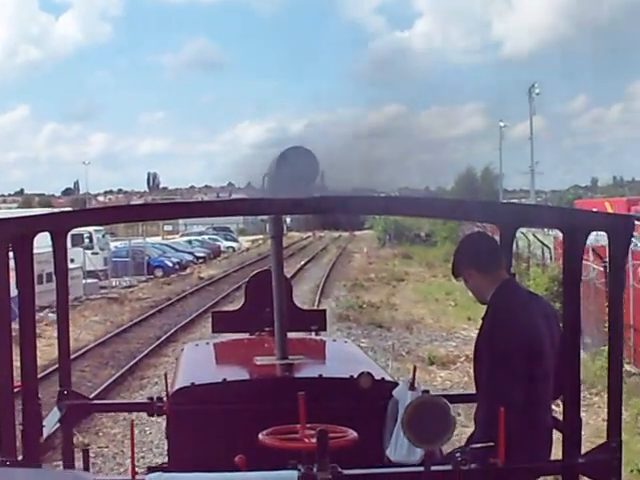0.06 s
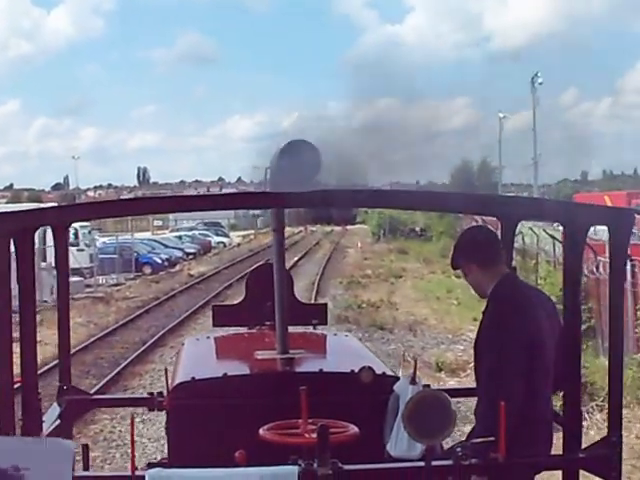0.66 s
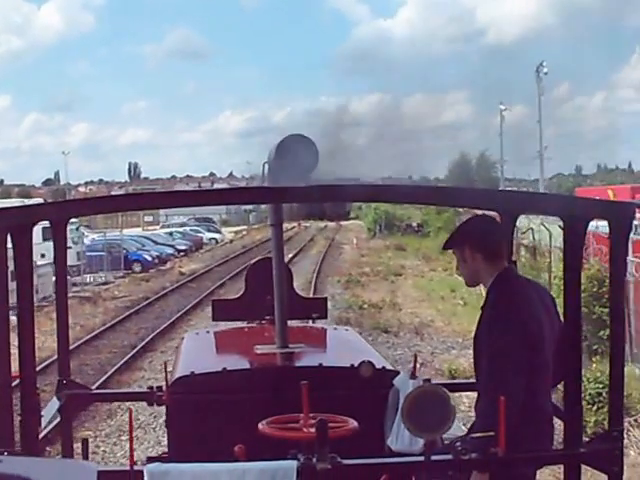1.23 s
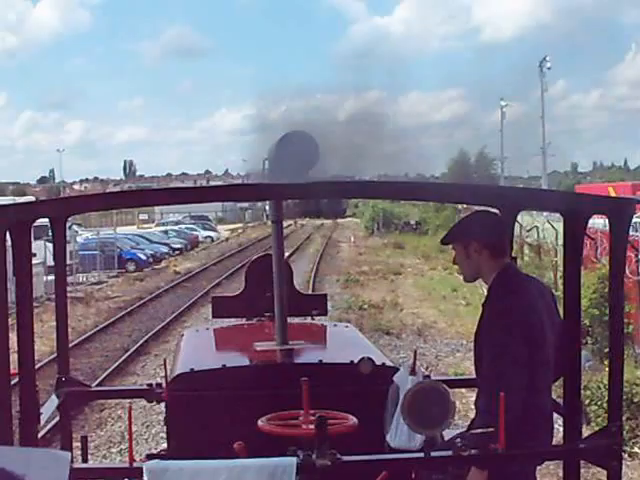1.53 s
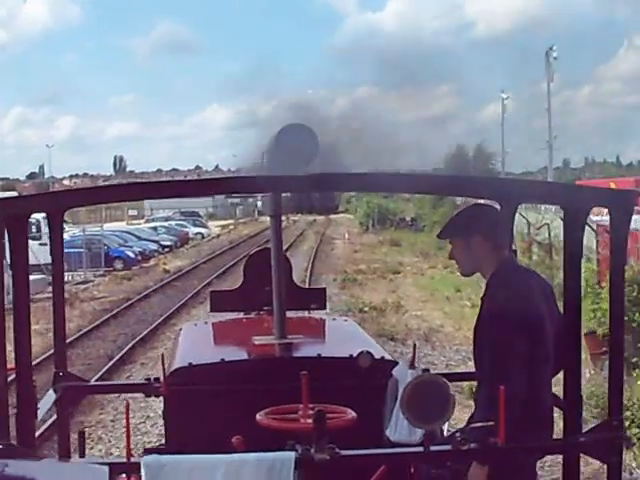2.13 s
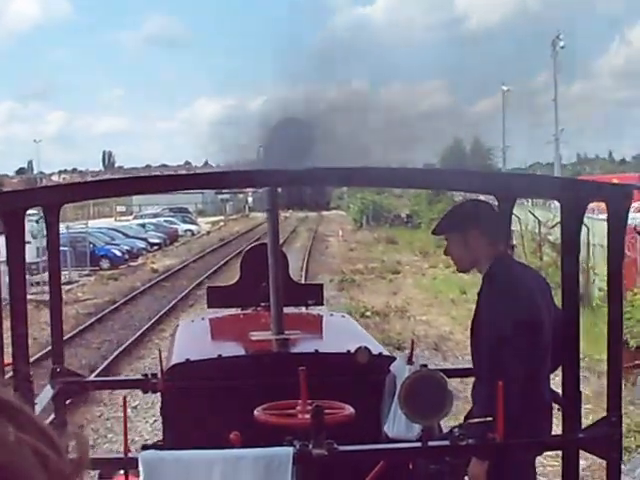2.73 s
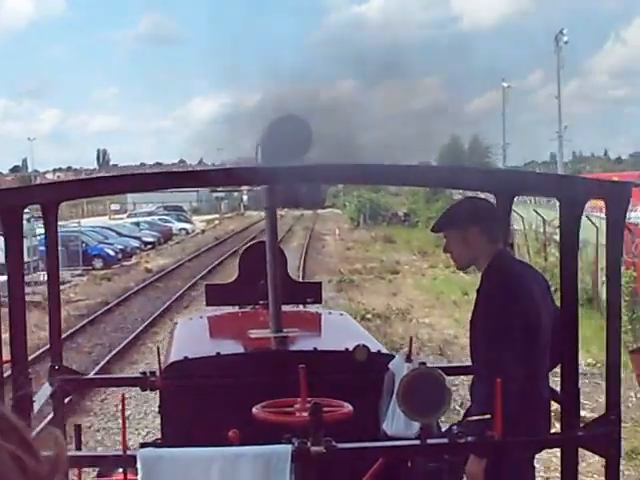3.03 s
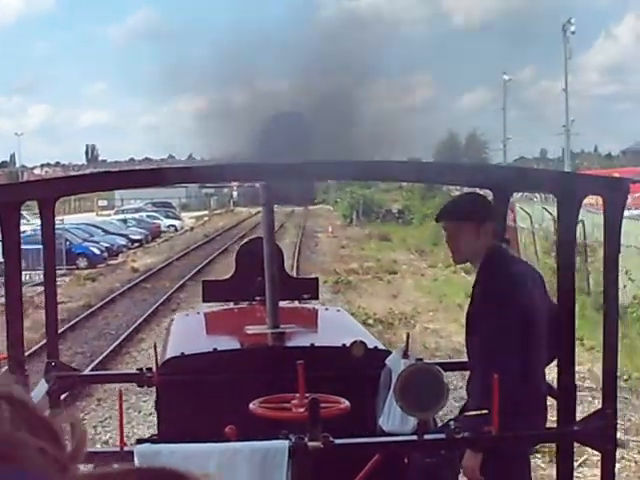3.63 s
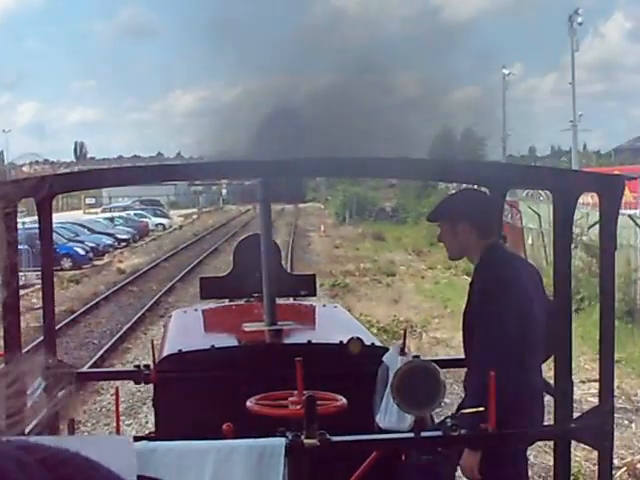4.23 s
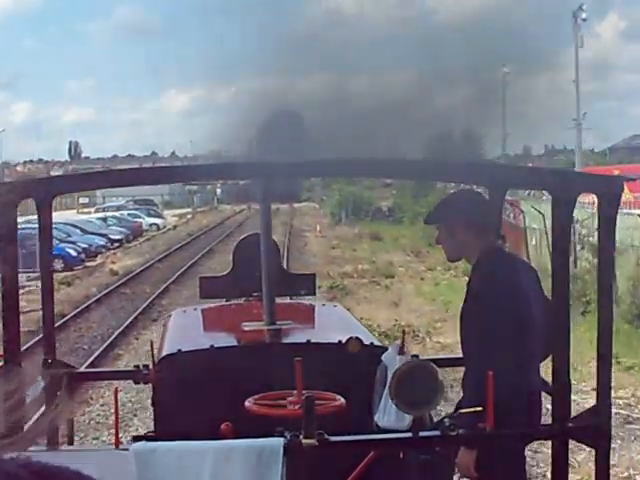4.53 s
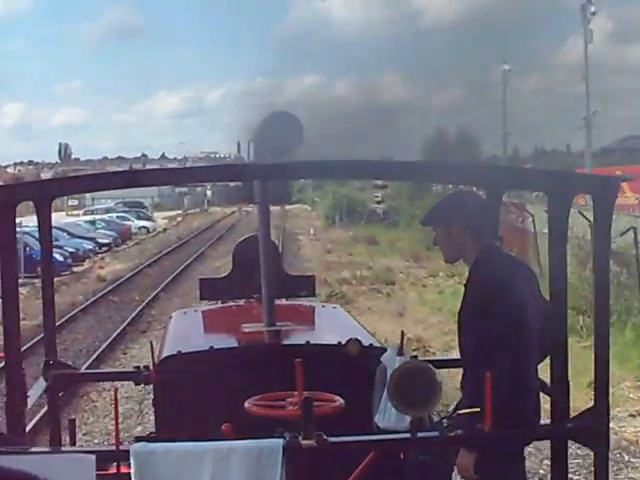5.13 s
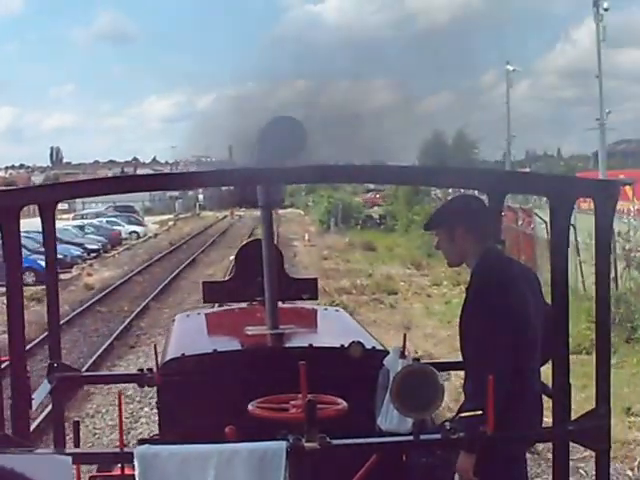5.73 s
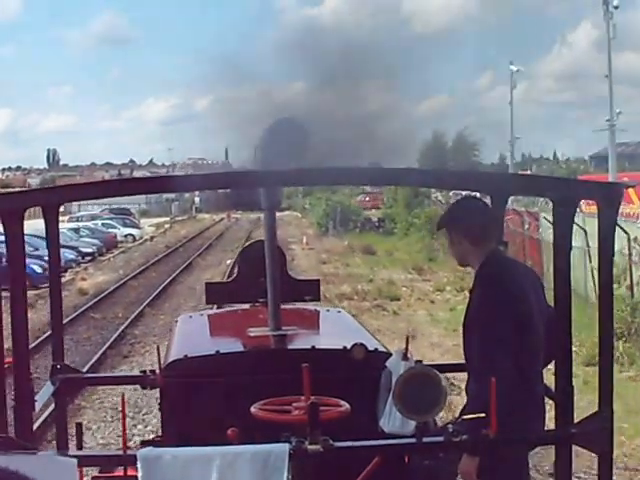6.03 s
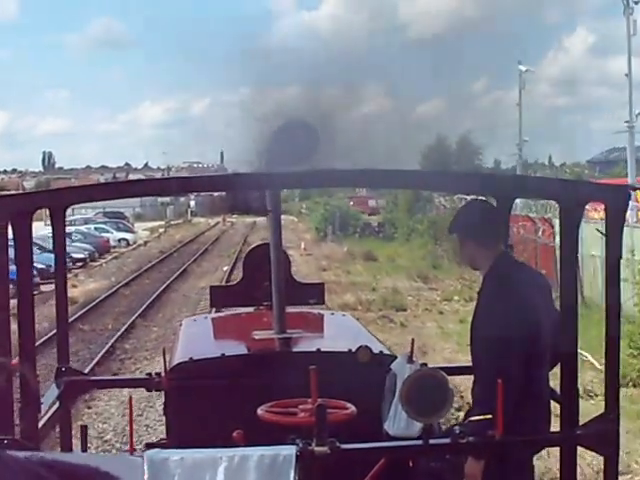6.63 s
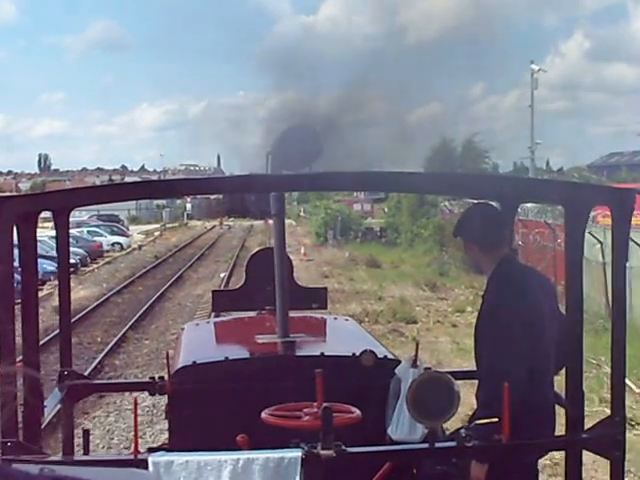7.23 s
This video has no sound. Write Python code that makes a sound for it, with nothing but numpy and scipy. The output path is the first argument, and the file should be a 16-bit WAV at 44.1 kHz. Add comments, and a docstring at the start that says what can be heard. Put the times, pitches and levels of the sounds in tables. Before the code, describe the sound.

A small diesel locomotive hauls a train slowly outdoors, heard from just behind its open cab. The engine runs from the first moment to the end, about seven seconds, at a steady speed of roughly eight closely paired exhaust beats a second. Each beat is a short, hissy bark from the stack over a deep, continuous boom, and a few hit slightly harder. Underneath, the wheels rumble low, machinery churns inside ringing metal panels and gears give a faint, wavering whine. A loose steel fitting ticks once at about 1 second. A low fan hum sinks after 1.5 seconds and swells again near 5. The running gear gives dull thumps at about 0.3, 2.4 and 5.2 seconds, its hardest double thump at 6.2, and a softer one at the very end, while the engine keeps chugging.

```python
"""A small two-cylinder diesel locomotive pulls a train at walking pace, heard from behind its open cab.
From the start the cylinders fire a quarter cycle apart, then rest: each firing barks from the stack
and sets the exhaust booming, over rumbling wheels, churning machinery and whining gears.
A loose fitting ticks at 0.9 s. The fan's hum sinks after 1.5 s and swells again near 5 s.
The running gear thumps now and then, hardest at 6.2 s."""
import sys
import numpy as np
from scipy.fft import rfft, irfft, next_fast_len
from scipy.io import wavfile
from scipy.ndimage import uniform_filter1d, map_coordinates

SR = 44100
rng = np.random.default_rng(int(sys.argv[2]) if len(sys.argv) > 2 else 0)


def int16_out(signal):
    """Quantize to a 16-bit WAV file."""
    q = np.round(np.clip(np.atleast_2d(signal).T, -1, 1) * 32767)
    wavfile.write(sys.argv[1], SR, q.astype(np.int16))


N = 320332
TIME_S = np.arange(N) / SR


def amp(db):
    return 10 ** (np.asarray(db) / 20)


def unit_rms(x):
    return x / np.sqrt(np.mean(x ** 2, axis=-1, keepdims=True) + 1e-20)


def colour(points, hz):
    """Gain through (freq_hz, gain_db) points on a log frequency axis."""
    freq_hz, gain_db = np.transpose(points)
    return amp(np.interp(np.log(hz + 1), np.log(freq_hz), gain_db))


def resonances(modes, hz):
    """Causal response of (pitch_hz, width_hz, gain_db) modes."""
    return sum(amp(db) * 1j * hz * width / (pitch ** 2 - hz ** 2 + 1j * hz * width)
               for pitch, width, db in modes)


def curve(points, at_s=TIME_S):
    """Linear interpolation of (time_s, value) points."""
    return np.interp(at_s, *np.transpose(points))


def wobble(rate_hz):
    """Smooth random curve with knots at rate_hz."""
    return map_coordinates(rng.standard_normal(int(N * rate_hz / SR) + 4), [TIME_S * rate_hz])


def filtered(x, response):
    size = next_fast_len(N + SR // 2)
    return irfft(rfft(x, size) * response(np.fft.rfftfreq(size, 1 / SR)), size)[:N]


def noise(response):
    return unit_rms(filtered(rng.standard_normal(N), response))


def placed(start_s, sounds):
    """Sum of short sounds, one row per start time."""
    index = np.round(start_s * SR).astype(int)[:, None] + np.arange(sounds.shape[1])
    inside = (index >= 0) & (index < N)
    return np.bincount(index[inside], sounds[inside], N)


# rumble spectrum: freq_hz, gain_db
RUMBLE_SPECTRUM = [(8, -20), (20, -2), (42, -7.5), (55, -4), (80, -8), (130, -14), (170, -17.5),
                   (300, -32.5), (600, -74.5)]
# rumble envelope: time_s, level_db
RUMBLE_LEVEL = [(0, -35), (0.5, -38.5), (1.7, -33), (2.1, -32.5), (3.4, -37.5), (4.1, -35.5), (5.4, -34.5),
                (6.4, -36), (7.26, -39.5)]


def rolling(swell_db=-0.5):
    """Wheels and underframe rumble along the track."""
    rumble = noise(lambda hz: colour(RUMBLE_SPECTRUM, hz))
    return rumble * amp(curve(RUMBLE_LEVEL) + swell_db * wobble(4.1))


# taps, ahead of the fitting's colour: start_s, level_db
FITTING_TAPS = [(0.9403, -24)]


def fitting_tick(t60_s=0.012):
    """A loose steel fitting taps once."""
    start_s, level_db = np.transpose(FITTING_TAPS)
    t = np.arange(SR // 40) / SR
    taps = rng.standard_normal((len(start_s), len(t))) * amp(level_db[:, None] - 60 * t / t60_s)
    steel = [(800, -19), (2800, 1.5), (5500, -2.0), (7500, -24)]
    return filtered(placed(start_s, taps), lambda hz: colour(steel, hz))


# running gear blows: start_s, relative_peak_db
BLOWS = [(0.256, -23.5), (2.356, -26.5), (5.203, -27), (6.204, -20), (6.255, -21.5), (7.231, -27)]
# frame modes: pitch_hz, width_hz, gain_db
FRAME_MODES = [(124, 49, 3), (182, 35, 2), (237.5, 15, 2), (317, 54, -15)]


def running_gear_thumps(t60_s=0.21, judder_db=-27, lowpass_hz=400, gain_db=1):
    """Slack running gear gives a dull blow and judders briefly; the frame answers."""
    start_s, peak_db = np.transpose(BLOWS)
    t = np.arange(SR // 4) / SR
    hz = np.fft.rfftfreq(len(t), 1 / SR)
    judder = rng.standard_normal((len(start_s), len(t))) * amp(judder_db - 60 * t / t60_s)
    force = (t == 0) + judder
    rings = irfft(rfft(force) * resonances(FRAME_MODES, hz) / (1 + 1j * hz / lowpass_hz) ** 2, len(t))
    rings /= np.abs(rings).max(axis=1, keepdims=True)
    return placed(start_s, rings * amp(peak_db + gain_db)[:, None])


# engine speed: time_s, cycle_rate_hz
ENGINE_SPEED = [(0.0, 8.231), (0.8, 8.025), (1.4, 8.146), (1.8, 8.004), (2.2, 8.18), (2.6, 8.074),
                (5.2, 8.242), (5.4, 8.102), (5.6, 8.294), (7.26, 8.336)]


def engine_cycles():
    """Cycles completed at each sample; clocks the fan, gears and firings."""
    return np.cumsum(curve(ENGINE_SPEED)) / SR


# fan hum envelope: time_s, level_db
FAN_LEVEL = [(0, -34), (1.5, -37), (2.3, -46), (3.7, -46.5), (4.9, -33.5), (6, -45), (6.7, -37),
             (7.26, -36.5)]
# gear mesh tones: engine_order, gain_db
GEAR_MESHES = [(58, 0), (54, -9), (48.65, -7)]
# gear whine envelope: time_s, level_db
WHINE_LEVEL = [(0, -50), (0.4, -47), (1.7, -50.5), (2.7, -42.5), (3.4, -48), (4, -42.5), (4.7, -47),
               (5.2, -45), (5.8, -54.5), (7.26, -44)]
# lower whine envelope: time_s, level_db
LOW_WHINE_LEVEL = [(0, -67), (2.7, -58.5), (4.7, -50), (7.26, -69.5)]


def fan_and_gears(slip_rad=1.0, backlash_rad=0.8, low_backlash_rad=0.6, flutter_db=2):
    """Fan blades and gear teeth follow engine speed, unsteady through belt slip and backlash."""
    cycle_rad = 2 * np.pi * engine_cycles()

    def tone(order, play_rad):
        return unit_rms(np.sin(order * cycle_rad + play_rad * wobble(9)) * amp(flutter_db * wobble(14)))

    hum = amp(curve(FAN_LEVEL)) * tone(order=11.15, play_rad=slip_rad)
    meshes = sum(amp(db) * tone(order, backlash_rad) for order, db in GEAR_MESHES)
    low_whine = amp(curve(LOW_WHINE_LEVEL)) * tone(order=44.2, play_rad=low_backlash_rad)
    return hum + amp(curve(WHINE_LEVEL)) * meshes + low_whine


# engine load: time_s, load_db
ENGINE_LOAD = [(0, -0.2), (0.8, 0.14), (1.6, -1.3), (3, 0.07), (4.6, 1), (6, 0.5), (6.6, -1.16), (7.26, 0)]


def load_db(at_s=TIME_S):
    """Engine load; drives churn, chuff and bark."""
    return curve(ENGINE_LOAD, at_s)


# engine and transmission spectrum: freq_hz, gain_db
CHURN_SPECTRUM = [(120, -22), (200, 6), (300, -2.5), (450, 0.5), (800, -1.5), (1300, -6), (1900, -8.5),
                  (2800, -13.5), (4700, -20.5), (5500, -23.5), (6700, -37.5), (7700, -60.5)]
# bonnet and frame panel modes: pitch_hz, width_hz, gain_db
PANEL_MODES = [(468.7, 26, 2.5), (573, 45, -4.5), (676, 44, 3), (851, 7.8, 4.5), (1088, 38, 6.5),
               (1242, 59, 2.5), (1398, 53, 1), (1594, 91, 1)]


def machinery(level_db=-38, load_share=1.2, flutter_db=1.54, rattle_db=-1.0):
    """Valve gear, chains and bearings churn inside ringing panels, harder under load."""
    churn = noise(lambda hz: colour(CHURN_SPECTRUM, hz) * (1 + resonances(PANEL_MODES, hz)))
    roughness = amp(flutter_db * wobble(40) + rattle_db * wobble(400))
    return unit_rms(churn * roughness) * amp(level_db + load_share * load_db())


def firings(lag_cycles=0.245, scatter_s=0.0003):
    """One pair of firings per cycle: their times and cylinders (0 first, 1 second)."""
    completed = engine_cycles()
    cycle, cylinder = np.divmod(np.arange(2 * int(np.ceil(completed[-1]))), 2)
    fire_s = np.interp(cycle + lag_cycles * cylinder, completed, TIME_S)
    return fire_s + scatter_s * rng.standard_normal(len(fire_s)), cylinder


# silencer eddy spectrum: freq_hz, gain_db
EDDY_SPECTRUM = [(70, -19), (120, 6.5), (150, -8.5), (190, 1), (240, -13), (330, -13.5), (600, -60.5)]


def silencer_chuff(fire_s, level_db=-43.5, rise_s=0.0065, t60_s=0.1):
    """After each firing, gas tumbles through the silencer: a short, low chuff."""
    t = np.arange(SR // 8) / SR
    puff = (1 - np.exp(-t / rise_s)) * amp(-60 * t / t60_s)
    flow = placed(fire_s, np.tile(puff, (len(fire_s), 1)))
    eddies = noise(lambda hz: colour(EDDY_SPECTRUM, hz))
    return unit_rms(flow * eddies) * amp(level_db + load_db())


# exhaust pipe and silencer modes: pitch_hz, width_hz, gain_db
PIPE_MODES = [(41.2, 8.4, 0.5), (60.6, 8.7, -8), (123.5, 5.7, 4.5), (179.6, 9.7, -0.5)]
# boom envelope: time_s, level_db
BOOM_LEVEL = [(0, -27), (0.6, -27.5), (2.7, -28.5), (3.4, -29), (4.5, -26), (5.5, -27), (6, -29.5),
              (7.26, -28)]


def exhaust_boom(fire_s, cylinder, lead_s=0.0001, width_s=0.0018, second_db=-1.3, scatter_db=0.9):
    """Each firing pushes one smooth slug of gas through the resonant exhaust."""
    size = amp(second_db * cylinder + scatter_db * rng.standard_normal(len(fire_s)))
    pushes = placed(fire_s - lead_s, size[:, None])
    slug = lambda hz: np.exp(-0.5 * (2 * np.pi * hz * width_s) ** 2)
    boom = filtered(pushes, lambda hz: resonances(PIPE_MODES, hz) * slug(hz))
    return unit_rms(boom) * amp(curve(BOOM_LEVEL))


# hard firings: time_s, extra_hiss_db, extra_clack_db
HARD_FIRINGS = [(0.489, 1, 4.5), (0.986, 3, 1.5), (1.356, 2.5, 3), (1.603, 4, 2), (1.976, 2.5, 1),
                (2.961, 3, 2.5), (3.208, 2, 0.5), (3.331, 1.5, -0.5), (3.578, 2.5, -1.5), (4.435, 4, -2.5),
                (6.015, 1.5, 3.5)]
# first cylinder's hiss at even load: time_s, level_db
HISS_LEVEL = [(0, -42), (1.3, -39), (3, -39.4), (5, -40.5), (7.26, -40)]


def bark_levels(fire_s, cylinder, clack_db=-40.5, clack_fade_db_per_s=0.47, second_db=-1.76,
                charge_db=0.11, hiss_scatter_db=1.04, clack_scatter_db=1.12):
    """Hiss and clack dB per firing: a pair shares its fuel charge, no two burn alike, a few hit hard."""
    charge, hiss, clack = rng.uniform(-np.sqrt(3), np.sqrt(3), (len(fire_s), 3)).T
    burn_db = np.array([hiss_scatter_db * hiss, clack_scatter_db * clack])
    burn_db += charge_db * np.repeat(charge[::2], 2)
    for time_s, *extra_db in HARD_FIRINGS:
        burn_db[:, np.argmin(np.abs(fire_s - time_s))] = extra_db
    effort_db = load_db(fire_s) + second_db * cylinder
    # the clack softens as the train gets under way
    base_db = np.array([curve(HISS_LEVEL, fire_s), clack_db - clack_fade_db_per_s * fire_s])
    return base_db + effort_db + burn_db


# gas jet spectrum: freq_hz, gain_db
JET_SPECTRUM = [(150, -40.5), (400, -19), (800, -4.5), (1500, -11), (2100, -1.5), (2600, -5.5),
                (3050, -13.5), (3700, -2), (4600, -2.5), (5500, -7), (6400, -15.5), (7100, -26),
                (7600, -43.5)]
# steel stack modes: pitch_hz, width_hz, gain_db
STACK_MODES = [(1839, 83, 12), (3666, 96, 3), (4610, 110, 2), (5800, 100, -13)]


def stack_bark(fire_s, cylinder, lead_s=0.001302, first_rise_s=0.0011, second_rise_s=0.001, blow_s=0.01,
               tail_db=-13.0, tail_t60_s=0.19, ragged_db=2, turbulence_db=2.1, split_hz=2950):
    """The opening valve lets out a ragged jet that rings the stack; cab and bonnet scatter a tail."""
    def random_rows(length, smoothing):
        return unit_rms(uniform_filter1d(rng.standard_normal((len(fire_s), length)), smoothing, axis=1))

    t = np.arange(SR // 8) / SR
    hz = np.fft.rfftfreq(len(t), 1 / SR)
    hiss_db, clack_db = bark_levels(fire_s, cylinder)
    rise_s = np.where(cylinder, second_rise_s, first_rise_s)[:, None]
    opening = 1 - np.exp(-(t / rise_s) ** 2)
    blow = np.exp(-(t / blow_s) ** 2) * amp(ragged_db * random_rows(len(t), smoothing=30))
    tail = amp(tail_db - 60 * t / tail_t60_s) * (1 - np.exp(-t / blow_s))
    jets = random_rows(len(t), smoothing=1) * opening * np.hypot(blow, tail)
    turbulence = amp(turbulence_db * random_rows(len(hz), smoothing=90))  # colours each puff
    spectra = rfft(jets) * turbulence * colour(JET_SPECTRUM, hz) * (1 + resonances(STACK_MODES, hz))
    lowpass = 1 / (1 + (hz / split_hz) ** 20)
    clack = unit_rms(irfft(spectra * lowpass, len(t))) * amp(clack_db)[:, None]
    hiss = unit_rms(irfft(spectra * (1 - lowpass), len(t))) * amp(hiss_db)[:, None]
    return placed(fire_s - lead_s, clack + hiss)


def scene():
    """Exhaust, machinery and running gear, summed to mono."""
    fire_s, cylinder = firings()
    exhaust = exhaust_boom(fire_s, cylinder) + silencer_chuff(fire_s) + stack_bark(fire_s, cylinder)
    engine = exhaust + machinery() + fan_and_gears()
    return (engine + rolling() + running_gear_thumps() + fitting_tick())[None]


# microphone port mode, subtracted: pitch_hz, width_hz, gain_db
PORT_MODE = [(5940, 240, -9)]
CUTOFF_HZ = 7700


def record(dry):
    """The microphone port notches the treble; a steep lowpass limits the band."""
    notched = filtered(dry[0], lambda hz: 1 - resonances(PORT_MODE, hz))
    return filtered(notched, lambda hz: 1 / np.sqrt(1 + (hz / CUTOFF_HZ) ** 80))[None]


dry = scene()
out = record(dry)
int16_out(out)
```